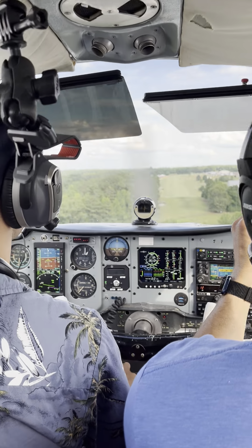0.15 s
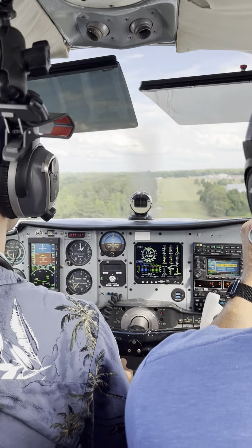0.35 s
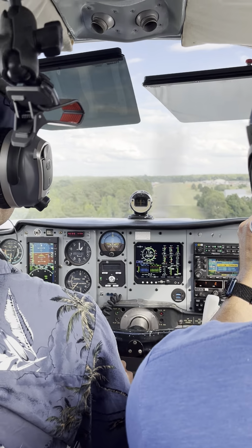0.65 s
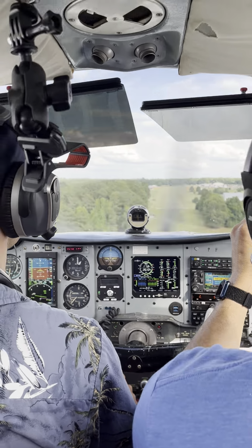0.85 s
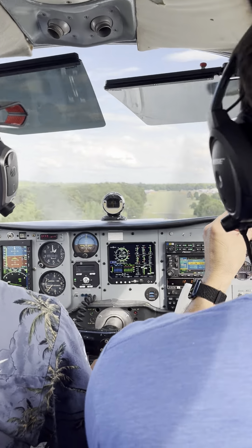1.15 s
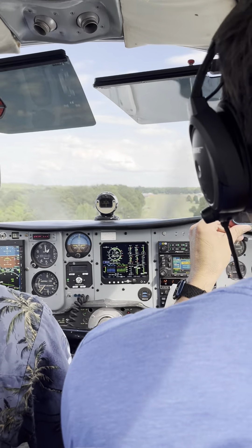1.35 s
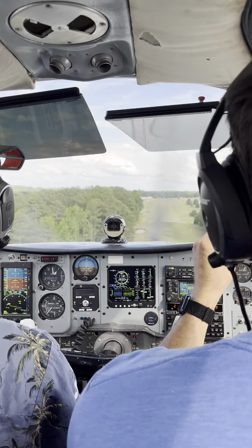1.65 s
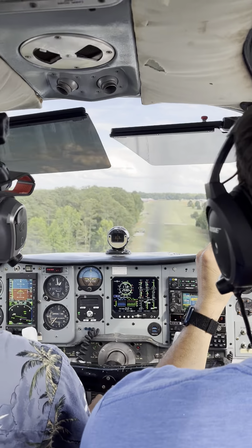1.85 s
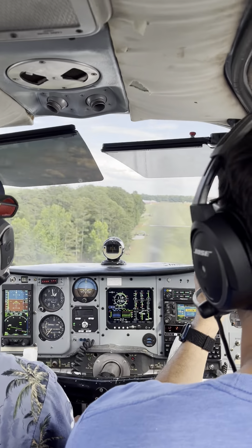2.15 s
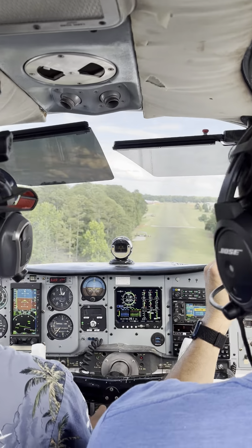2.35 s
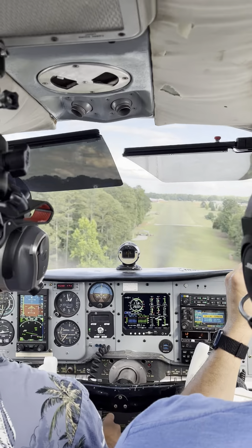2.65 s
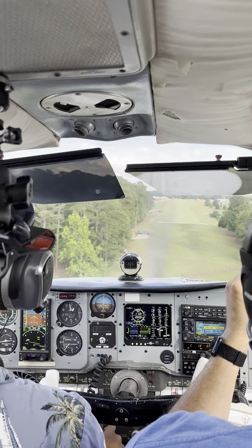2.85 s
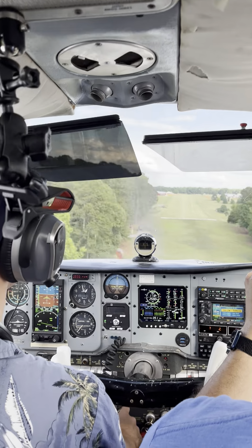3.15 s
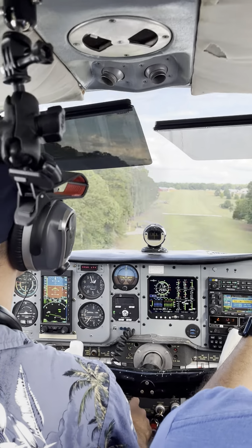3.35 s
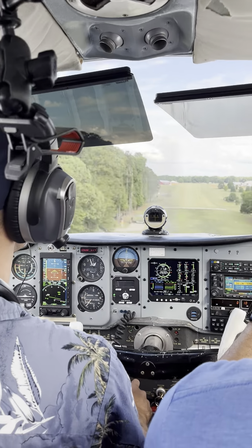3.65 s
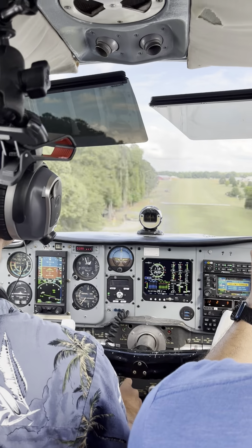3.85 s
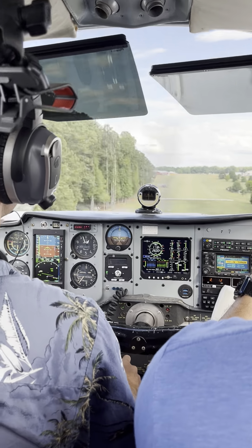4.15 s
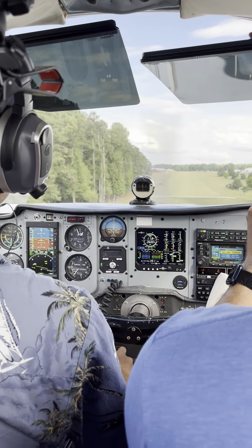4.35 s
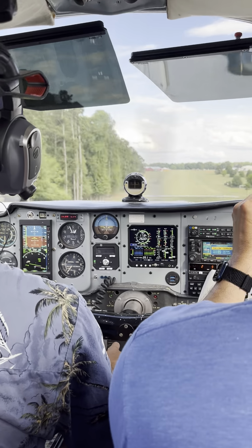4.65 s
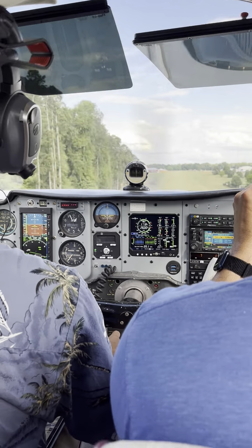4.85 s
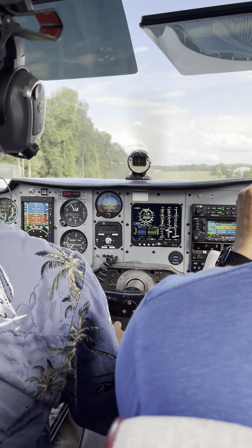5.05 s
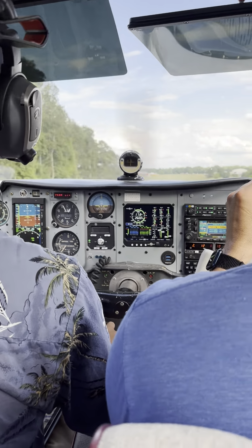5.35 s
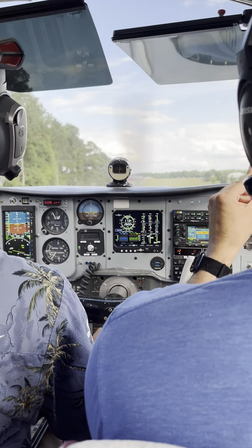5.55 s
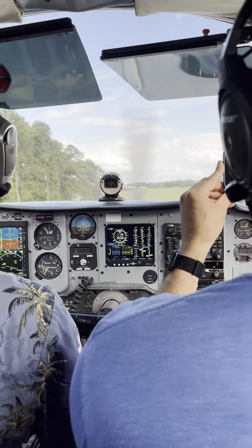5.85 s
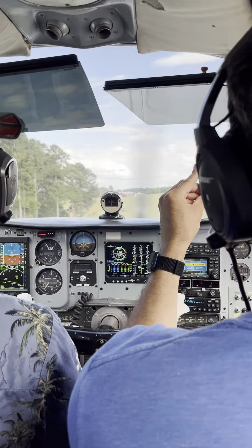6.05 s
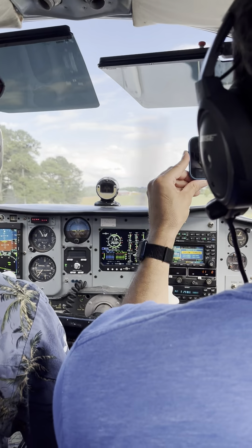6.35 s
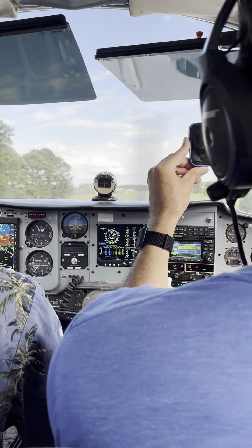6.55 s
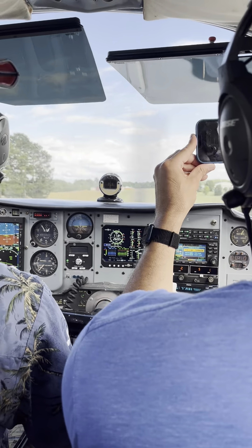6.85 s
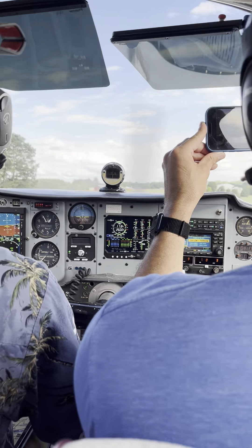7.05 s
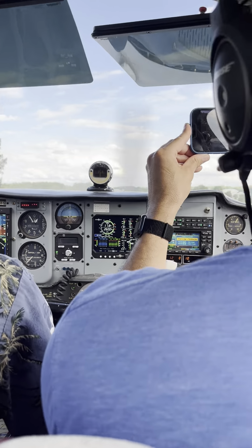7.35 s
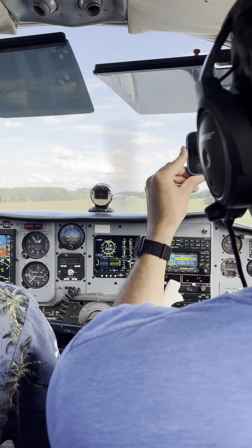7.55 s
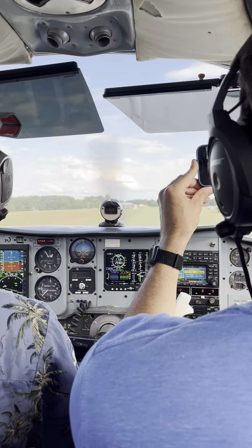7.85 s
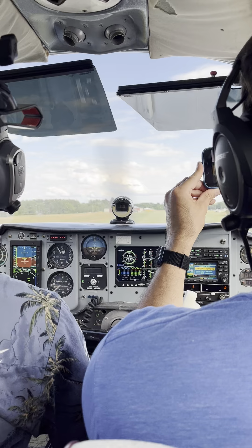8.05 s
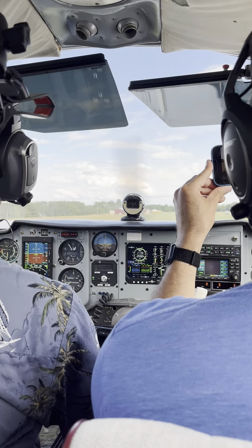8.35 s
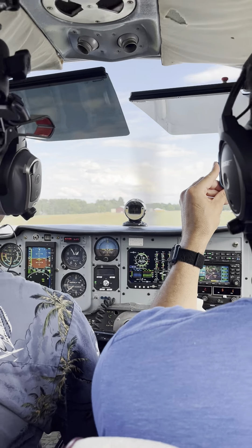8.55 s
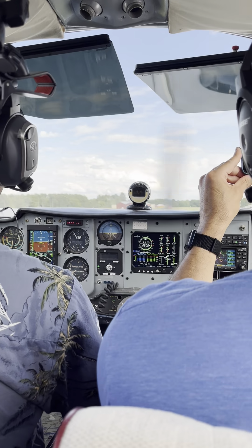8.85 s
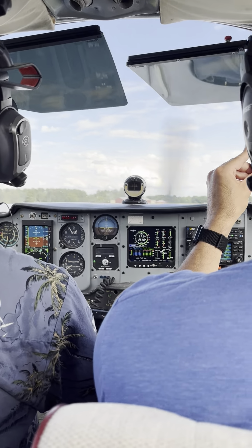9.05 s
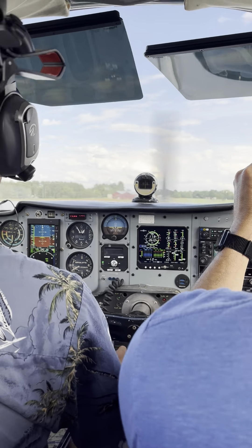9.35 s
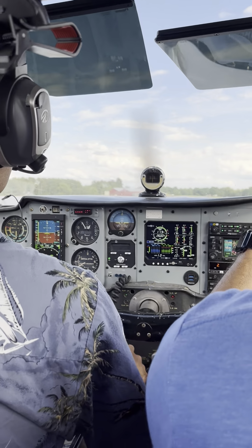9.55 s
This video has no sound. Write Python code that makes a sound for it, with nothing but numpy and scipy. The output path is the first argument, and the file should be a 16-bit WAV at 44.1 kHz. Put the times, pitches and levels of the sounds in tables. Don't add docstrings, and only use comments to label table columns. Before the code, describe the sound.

Close, dense cabin sound from a small propeller plane: a steady deep buzz around 130 hertz, its level swelling irregularly, wrapped in low rumble and broadband hiss. Wind thumps and snaps at the handheld stereo microphone at the start and harder just after three seconds, with the bass dipping each time. Air faintly hisses past a door seal between them; later the drone dominates, with only slight bumps near eight seconds.

```python
import sys
import numpy as np
from scipy import signal
from scipy.fft import rfft, irfft, next_fast_len
from scipy.io import wavfile

SR = 44100
rng = np.random.default_rng(int(sys.argv[2]) if len(sys.argv) > 2 else 0)


def output_pcm(signal):
    pcm = np.clip(np.atleast_2d(signal).T, -1, 1) * 32767
    wavfile.write(sys.argv[1], SR, np.round(pcm).astype(np.int16))


def attenuation_scalar(level_db):
    decades = np.asarray(level_db, float) / 20
    return 10 ** decades


N = 427329
TIME_S = np.arange(N) / SR
CYCLE_HZ = 21.655
LEFT_RIGHT = np.array([[1], [-1]])


def rms_one(x):
    return x / np.sqrt(np.mean(x ** 2) + 1e-20)


def at_hz(points, hz):
    known_hz, value = np.transpose(points)
    return np.interp(np.log(hz + 1), np.log(known_hz), value)


def drift(rate_hz):
    pole = np.exp(-16 * np.pi * rate_hz / SR)
    noise = rng.standard_normal(N // 8 + 9002)
    slow = signal.lfilter([1], [1, -2 * pole, pole ** 2], noise)[9000:]
    return np.interp(np.arange(N) / 8, np.arange(len(slow)), rms_one(slow))


def spell(start_s, end_s, attack_s, release_s):
    rise = (TIME_S - start_s) / attack_s
    fall = 1 - (TIME_S - end_s) / release_s
    return np.clip(np.minimum(rise, fall), 0, 1)


def split(x, edge_hz, order=3):
    low = signal.sosfiltfilt(signal.butter(order, edge_hz, fs=SR, output="sos"), x)
    return low, x - low


def band(x, order, low_hz, high_hz):
    return signal.sosfilt(signal.butter(order, [low_hz, high_hz], "band", fs=SR, output="sos"), x)


def cycle_angle():
    return 2 * np.pi * np.cumsum(CYCLE_HZ * (1 + 0.000793 * drift(0.75))) / SR


# (time [s], level [dB])
LOADING = [(0, -15.5), (1.9, -17), (2.9, -19), (4.7, -17.5), (5.5, -17.5), (5.75, -12.5), (6.07, -22.5),
           (6.45, -18), (6.85, -14.5), (7.27, -16), (7.55, -25), (7.95, -14), (8.3, -18.5), (8.8, -17),
           (9.2, -23.5), (9.69, -17)]


def propeller_loading():
    time_s, level_db = np.transpose(LOADING)
    firing_db = np.interp(TIME_S, time_s, level_db)
    return firing_db, firing_db - firing_db.mean()


# (multiple of the cycle rate [1], level [dB])
ENGINE_TONES = [(1, -44), (2, -20), (3, -12.5), (4, -16.5), (5, -15), (6, -2), (7, -21), (8, -11), (9, -10),
                (10, -15.5), (11, -20.5), (12, -13.5), (13, -16), (14, -15.5), (15, -15.5), (16, -16),
                (17, -21), (18, -16.5), (19, -28.5), (20, -50), (21, -32), (22, -24.5), (23, -29.5),
                (24, -34), (25, -32), (26, -28.5), (27, -25), (28, -26)]


def engine(angle, firing_db, loading_db):
    out = np.zeros((2, N))
    firing_order = 6
    tones_db = -19 + 0.05 * loading_db
    for order, level_db in ENGINE_TONES:
        swell_db = 2.0 * drift(6.0)
        phase = order * angle + rng.uniform(0, 2 * np.pi) + 0.38 * drift(2.8)
        port_lead = 0.1 + 0.0013 * order * CYCLE_HZ
        base_db = firing_db - 0.58 * swell_db if order == firing_order else tones_db
        out += attenuation_scalar(base_db + level_db + swell_db) * np.sin(phase - 0.5 * port_lead * LEFT_RIGHT)
    return np.sqrt(2) * out


# (frequency [Hz], lead of the left [rad], likeness [0-1])
PORTS = [(0, 0, .99), (250, -.18, .97), (1000, -.55, .7), (1750, 0, .9), (2000, .6, .8), (2300, 2.4, .6),
         (2650, 2.9, .8), (3300, 1.9, .5), (3900, .6, .45), (4450, 2.5, .15), (5000, 1.3, .4),
         (5850, 3.14, .96), (10150, 9.42, .975), (14650, 15.7, .965), (15700, 16.8, .965)]


def port_noise(spectrum):
    size = next_fast_len(N)
    hz = np.arange(size // 2 + 1) * SR / size
    known_hz, lead, alike = np.transpose(PORTS)
    alike = np.clip(np.interp(hz, known_hz, alike), 0, 1)
    shared, *own = rfft(rng.standard_normal((3, size)))
    turn = np.exp(0.5j * np.interp(hz, known_hz, lead) * LEFT_RIGHT)
    both = np.sqrt(alike) * shared * turn + np.sqrt(1 - alike) * np.array(own)
    return rms_one(irfft(both * attenuation_scalar(at_hz(spectrum, hz)), size)[:, :N])


# (frequency [Hz], density [dB per Hz])
ROAR_SPECTRUM = [(20, -93), (45, -50), (80, -39), (160, -44.5), (250, -53.5), (420, -56), (1000, -62),
                 (1600, -65.5), (2600, -62.5), (4000, -73), (5200, -73), (7500, -81.5), (9500, -79.5),
                 (12000, -86.5), (16000, -90.5)]


def airframe(angle, loading_db):
    low, hiss = split(port_noise(ROAR_SPECTRUM), 770)
    rumble, roar = split(low, 83)
    roar_db = -20 - 0.1 * loading_db + 0.92 * drift(22)
    rumble_db = 2 + 2.0 * drift(9.3)
    throb = 1 + 0.21 * np.cos(2 * angle) + 0.12 * np.cos(3 * angle + 0.9)
    body = attenuation_scalar(roar_db) * throb * (roar + attenuation_scalar(rumble_db) * rumble)
    return body + attenuation_scalar(-19 + 0.41 * drift(25)) * hiss


def crackle():
    eddies_per_s = 55
    draws = rng.random((int(N / SR * 120), 2))
    at = (np.cumsum(0.5 + draws[:, 0]) / eddies_per_s * SR).astype(int)
    inside = at < N
    clicks = np.full(N, 1e-18)
    clicks[at[inside]] = attenuation_scalar(7.9 * draws[inside, 1])
    decay = np.exp(-1 / (0.0025 * SR))
    bursts = signal.lfilter([1], [1, -decay], clicks) * rng.standard_normal(N)
    return rms_one(band(bursts, 3, 220, 870))


# (start [s], length [s], strength [dB], brightness [dB])
DRAUGHTS = [(-.02, 0.13, -7.5, -4.5), (0.147, .2, -9, -1), (0.368, 0.21, -11, -4), (0.594, 0.16, -11, -4),
            (0.771, 0.15, -4, -2), (0.945, 0.22, -15, -5), (3.093, 0.06, -8.5, -10),
            (3.164, 0.084, -6.5, -3.5), (3.257, .1, -8.5, -0.5), (3.353, .11, -5, -3),
            (3.488, 0.17, -13.5, -4), (3.704, 0.11, -13.5, -6), (3.858, 0.086, -8.5, -7),
            (4.01, .12, -12, -6), (7.956, .4, -20.5, -5.5), (8.4, 0.17, -18.5, -12)]
# (frequency [Hz], density [dB per Hz])
BUFFET_SPECTRUM = [(18, -41), (30, -6), (70, 1), (269, -7), (308, -6.5), (393, -9.5), (1450, -21.5),
                   (2700, -59.5), (4700, -41), (6000, -81), (7800, -91), (13200, -120)]


def draughts():
    size = next_fast_len(N)
    colour = attenuation_scalar(at_hz(BUFFET_SPECTRUM, np.arange(size // 2 + 1) * SR / size))
    buffet = irfft(rfft(rng.standard_normal(size)) * colour, size)
    low, high = split(rms_one(buffet[:N]), 336)
    lumps, flutter = drift(32), drift(100)
    low = low * attenuation_scalar(1.0 * lumps + 0.8 * drift(20))
    high = high * attenuation_scalar(3.1 * lumps + 2.3 * flutter - 5.5) + attenuation_scalar(-12.5) * crackle()
    out = np.zeros(N)
    for start_s, length_s, strength_db, bright_db in DRAUGHTS:
        blow = spell(start_s, start_s + length_s, attack_s=0.015, release_s=0.056)
        out += blow * attenuation_scalar(strength_db) * (low + attenuation_scalar(bright_db) * high)
    return out


# (time [s], peak [dB], pitch [Hz], crack [dB])
SNAPS = [(0.094, -8.5, 406, -30), (0.238, -6.5, 884, -26), (0.255, -5, 776, -20), (0.315, -10, 567, -19),
         (0.457, -12, 560, -14), (3.555, -20, 420, -26), (0.599, -8, 645, -21), (0.798, -5, 401, -12),
         (0.806, -5, 834, -12), (0.821, -4.5, 436, -15), (8.263, -10, 200, -30), (0.881, -5.5, 620, -28),
         (0.915, -6, 1010, -9), (1.038, -14, 300, -24), (1.173, -16, 608, -12), (3.175, -6, 423, -19),
         (3.214, -5, 479, -29), (3.247, -7.5, 490, -6), (3.298, -3, 430, -16), (4.021, -15, 700, -11),
         (3.344, -2, 457, -14), (3.377, -12, 495, -20), (3.448, -6, 443, -21), (3.494, -22, 433, -24),
         (3.712, -14, 520, -22), (3.758, -17, 670, -22), (3.874, -19, 565, -28), (3.934, -17, 623, -21),
         (8.44, -11, 493, -25), (8.479, -13, 420, -24),
         (3.232, -9, 430, -22), (3.26, -10, 410, -22), (3.277, -9, 700, -26), (3.325, -8, 450, -22),
              (3.408, -10, 400, -28), (3.428, -10, 400, -30), (3.464, -9, 400, -28)]


def snaps():
    length = 1500
    out, t = np.zeros(N + length), np.arange(length) / SR
    eddies = SNAPS
    white = rng.standard_normal((len(eddies), 2, length))
    chance_db = 2.0 * rng.standard_normal((len(eddies), 2))
    cracks = 2.44 * band(white[:, 0] * np.exp(-t / 0.0018), 5, 1300, 5500)
    puffs = 1.2 * band(white[:, 1] * np.exp(-t / 0.0051), 2, 350, 1500)
    thump = -np.sin(2 * np.pi * 110 * t) * np.exp(-t / 0.0039)
    soften = signal.butter(3, 1700, fs=SR, output="sos")
    for eddy, crack, puff, (puff_db, thump_db) in zip(eddies, cracks, puffs, chance_db):
        time_s, peak_db, hz, crack_db = eddy
        swing = -np.sin(2 * np.pi * hz * t) * np.exp(-t / 0.002)
        blunt = swing + attenuation_scalar(2.0 + thump_db) * thump + attenuation_scalar(puff_db) * puff
        snap = signal.sosfilt(soften, blunt) + attenuation_scalar(crack_db - 6.5) * crack
        at = round(time_s * SR)
        out[at:at + length] += attenuation_scalar(peak_db + 6.0) * snap
    return out[:N]


# (frequency [Hz], lead of the left [rad])
WIND_LEAD = [(20, -.4), (90, -.55), (180, -.8), (600, -1.25), (1200, -.9), (1800, 0), (2600, 1.4),
             (3800, .6), (6000, 2.2)]


def spread(wind):
    size = next_fast_len(N + 4000)
    lead = at_hz(WIND_LEAD, np.arange(size // 2 + 1) * SR / size)
    return irfft(rfft(wind, size) * np.exp(0.5j * lead * LEFT_RIGHT), size)[:, :N]


# (start [s], end [s], level [dB])
LEAKS = [
    (1.3, 3.1, -32.5),
    (5.693, 6.5, -40),
]


def leak():
    whistle = rms_one(band(port_noise(ROAR_SPECTRUM), 2, 960, 1620))
    fade_s = 0.57
    return whistle * sum(attenuation_scalar(db) * spell(on, off, fade_s, fade_s / 2) for on, off, db in LEAKS)


def scene():
    firing_db, loading_db = propeller_loading()
    angle = cycle_angle()
    wind = spread(draughts() + snaps())
    return engine(angle, firing_db, loading_db) + airframe(angle, loading_db) + wind + leak()


# (closes [s], opens [s])
GUARD = [
    (-.5, 1.69),
    (3.6, 4.454),
]


def guard(depth_db, late_s, open_s):
    closed = sum(spell(on, off + late_s, 0.032, open_s) for on, off in GUARD)
    return attenuation_scalar(depth_db * closed)


def wind_guard(x):
    bass, rest = split(x, 415, order=6)
    bass, upper_bass = split(bass, 200)
    deep, bass = split(bass, 55)
    low_mid, treble = split(rest, 1480)
    deep = guard(-5, late_s=0.81, open_s=0.9) * deep
    bass = guard(-11.5, late_s=0, open_s=0.27) * (bass + deep)
    upper_bass = guard(-12.5, late_s=-0.065, open_s=0.19) * upper_bass
    low_mid = guard(-4.5, late_s=0.22, open_s=0.23) * low_mid
    return bass + upper_bass + low_mid + treble


# (start [s], end [s], depth [dB])
RIDES = [
    (3.155, 3.603, -5.5),
    (9.274, 9.9, -1.5),
]


def gain_control():
    return attenuation_scalar(sum(db * spell(on, off, attack_s=0.36, release_s=0.089) for on, off, db in RIDES))


def capsule(x):
    x = signal.sosfilt(signal.butter(6, 38, "high", fs=SR, output="sos"), x)
    ring_hz, width_hz = 15900, 440
    ring = signal.lfilter(*signal.iirpeak(ring_hz, ring_hz / width_hz, fs=SR), x)
    return x + attenuation_scalar(2.0) * ring


def band_limit(x):
    return signal.sosfilt(signal.butter(12, 15910, fs=SR, output="sos"), x)


def record(dry):
    x = capsule(gain_control() * wind_guard(dry))
    top_cut = signal.ellip(14, 0.5, 60, 15700, fs=SR, output="sos")
    mix = signal.sosfilt(top_cut, np.tanh(x))
    return band_limit(mix)


dry = scene()
out = record(dry)
output_pcm(out)
```